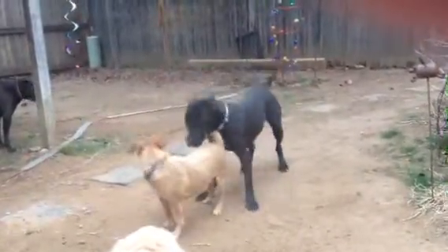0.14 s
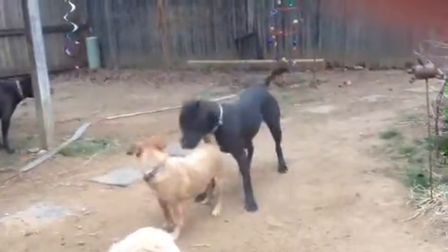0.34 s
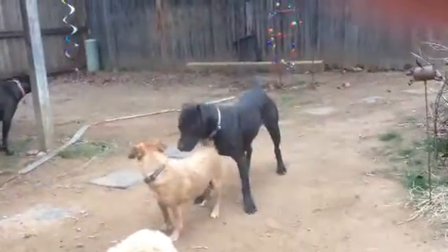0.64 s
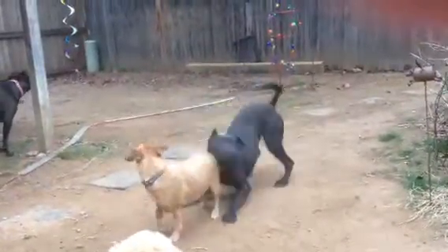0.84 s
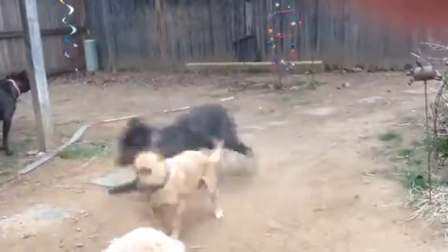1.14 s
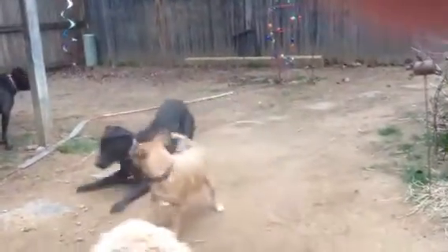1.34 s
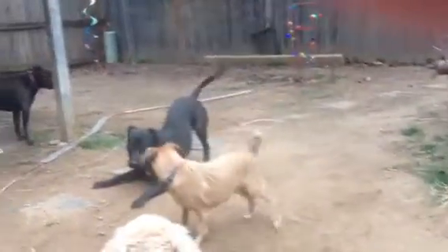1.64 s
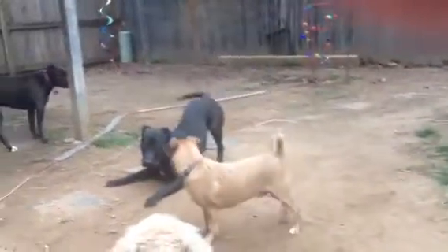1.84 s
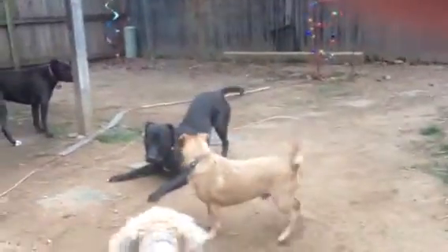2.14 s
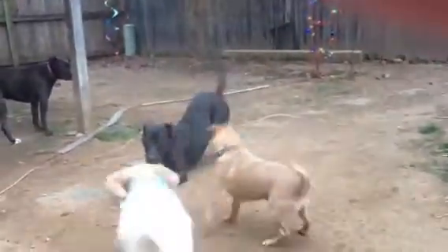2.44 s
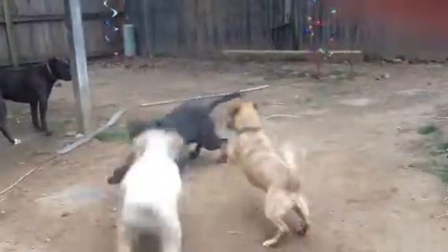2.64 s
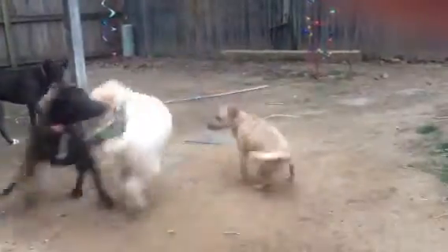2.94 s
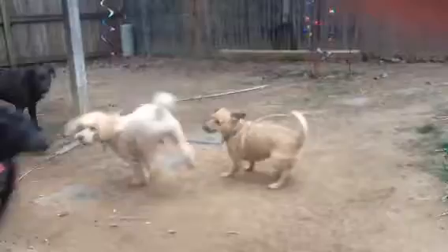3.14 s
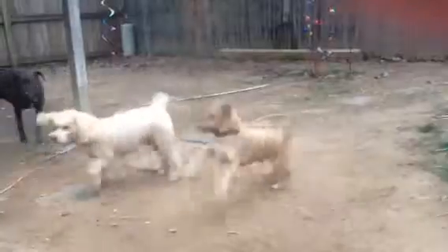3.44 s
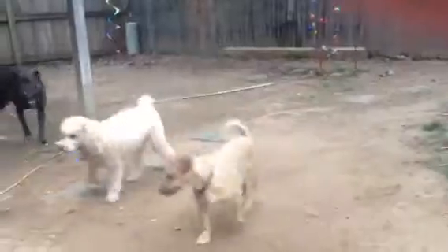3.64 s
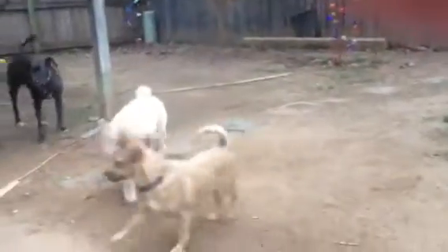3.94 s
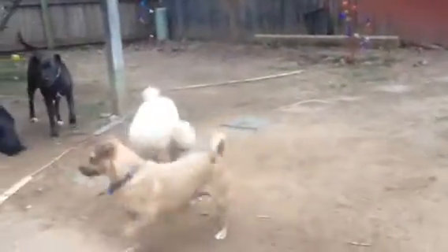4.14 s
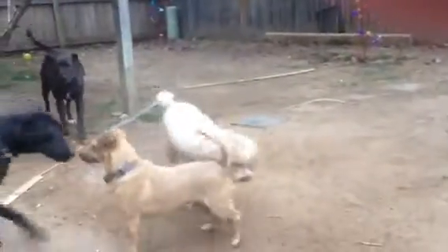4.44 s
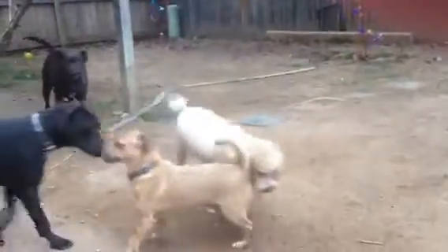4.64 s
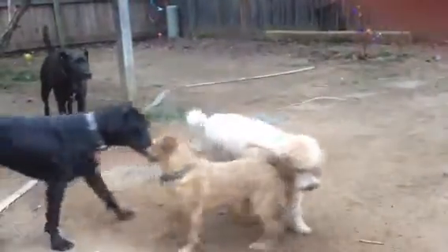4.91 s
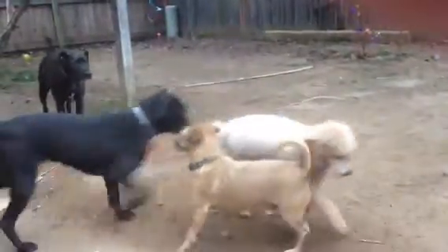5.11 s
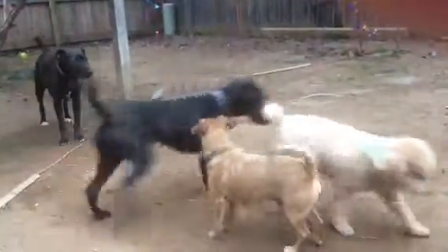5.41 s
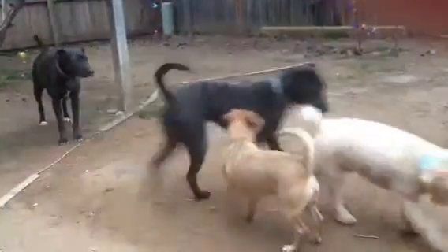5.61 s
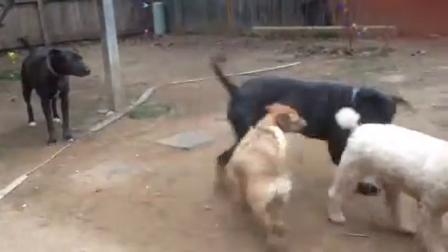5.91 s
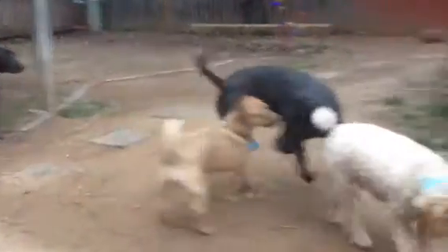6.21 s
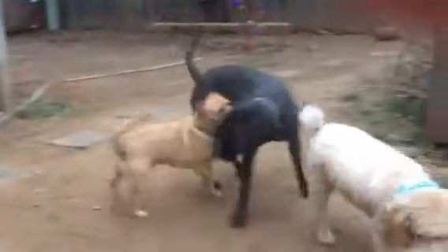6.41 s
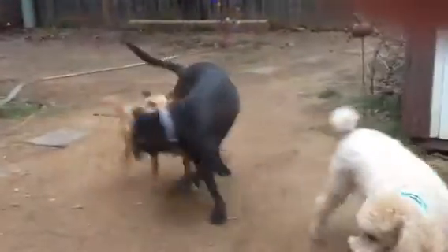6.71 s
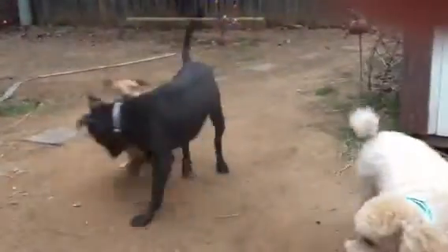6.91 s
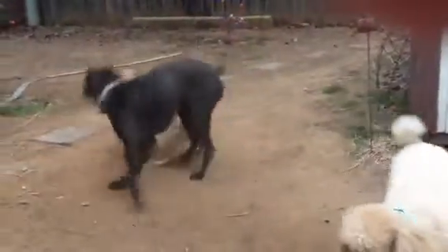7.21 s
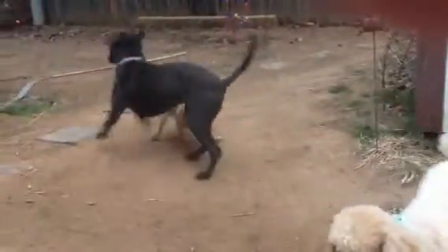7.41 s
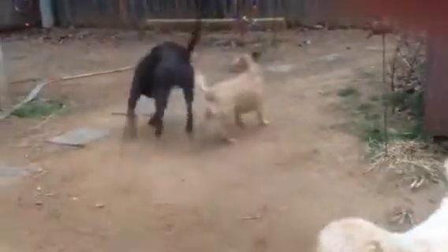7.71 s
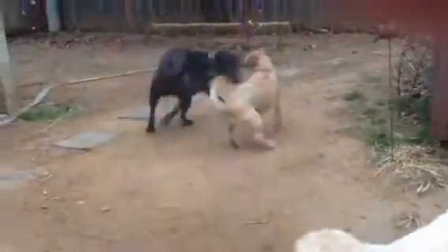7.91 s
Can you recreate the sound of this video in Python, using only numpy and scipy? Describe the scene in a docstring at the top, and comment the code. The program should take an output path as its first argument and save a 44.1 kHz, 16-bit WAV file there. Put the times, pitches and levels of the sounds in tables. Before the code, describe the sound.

Dogs play outdoors with high yelps and one harsh bark, while paws scuff the dirt and collar tags jingle.

```python
"""Dogs wrestle in a fenced dirt yard, over a low outdoor hum. First paws scuff and thud, grit ticks
and collar tags jingle. From 2.2 s a small dog's vocal folds yelp in rising and falling arcs, rasping
as the mouth widens. At 2.8 s one harsh bark breaks out over a growl of loose throat tissue; a gruff
huff follows at 3.3 s. Yelps return at 4.1 and 5.2 s, echoed by the fences. Faint moans and whimpers
come last, as the scuffing and jingling go on."""
import sys
import numpy as np
from scipy import signal
from scipy.fft import rfft, irfft, next_fast_len
from scipy.io import wavfile
from scipy.ndimage import map_coordinates

SR = 44100
rng = np.random.default_rng(int(sys.argv[2]) if len(sys.argv) > 2 else 0)


def master(y):
    """Save y as 16-bit WAV."""
    cut = np.clip(np.atleast_2d(y).T, -1, 1)
    pcm = np.round(cut * 32767)  # scale
    wavfile.write(sys.argv[1], SR, pcm.astype(np.int16))


N = 355446

# Spectra: (frequency [Hz], level [dB])
HUM_SPECTRUM = [(15, -93), (25, -57), (64, -13.5), (91, -12.5), (110, 0), (228, 2), (371, -8.5),
                (1010, -10), (2810, -20.5), (3490, -26), (4450, -25), (5670, -41.5), (8270, -38),
                (13400, -33), (15800, -38)]
HISS_SPECTRUM = [(1500, -59.5), (3500, -15.5), (4700, -8.5), (5600, 7), (6300, -2.5), (7500, -16),
                 (12000, -50)]
DIRT_SPECTRUM = [(530, -44), (900, -12), (1010, -15), (1160, -14.5), (1740, -11), (2620, -9), (4540, -6.5),
                 (5440, 3.5), (9100, -24), (14900, -14), (15800, -23)]
GROWL_SPECTRUM = [(40, -32.5), (120, -11.5), (230, 5), (330, 12), (500, -17), (900, -31), (3000, -75)]
HUFF_SPECTRUM = [(71, -44), (120, -13), (339, -4), (484, -21.5), (647, 0.5), (780, -10.5), (1100, -7.5),
                 (1300, -23.5), (2240, -16.5), (2480, -19.5), (7000, -26), (9100, -32), (15400, -120)]
MOAN_SPECTRUM = [(200, -48), (320, 4), (380, 3.5), (440, -21), (600, -38), (1500, -49)]
BARK_RASP_SPECTRUM = [(120, -68.5), (520, -24), (700, 1.5), (800, 0.5), (930, -3.5), (1170, 1.5),
                      (1450, -1.5), (1850, -16.5), (2400, -6), (3200, -22), (5300, -28), (6400, -28.5),
                      (7800, -52.5), (15000, -58)]
YELP_RASP_SPECTRUM = [(100, -72.5), (480, -30), (680, -3), (900, -7), (1200, 6), (1400, -3.5), (1750, -7),
                      (2300, 0.5), (2650, -20), (3000, -25), (4000, -17.5), (4500, -22), (5500, -22),
                      (9000, -46.5)]
MOUTH_SPECTRUM = [(400, -0.5), (1300, -1.5), (1850, -2.5), (2450, -6.5), (2850, -2.5), (3400, -20.5),
                  (4050, -12), (4450, -19.5), (4800, -20.5), (5600, -11.5), (6400, -31), (7300, -36),
                  (8400, -25.5), (9600, -50)]
EARTH_SPECTRUM = [(30, -35), (90, -14.5), (160, -8), (250, 3), (500, -30), (3000, -41)]
TEETH_SPECTRUM = [(500, -60), (2000, -22), (3500, -5), (5100, 1), (6300, -7.5), (7800, -24),
                  (15000, -19.5)]
# Grit spectrum: (frequency / pitch [ratio], level [dB])
TICK_SHAPE = [(.1, -50), (.72, -18), (.85, -2), (1.1, 0), (1.5, -16), (2.1, -15), (2.6, -26)]
# Yard decay: (frequency [Hz], t60 [s])
YARD_DECAY = [(150, 0.71), (700, 0.46), (1400, 0.54), (3000, 0.57), (6000, 0.46), (14000, .33)]
# Paw landings: (time [s], level [dB])
PAW_THUDS = [(0.795, -44.5), (0.925, -51), (1.265, -58), (3.56, -58.5)]
# Paw slides: (peak time [s], length [s], relative level [dB])
PAW_SLIDES = [(0.093, 0.11, -58.5), (0.721, .07, -60), (.79, .14, -55), (0.944, 0.39, -49.5),
              (1.154, .1, -49.5), (1.266, 0.46, -47), (1.675, 0.078, -58), (2.128, .11, -55),
              (2.47, 0.44, -48.5), (2.658, 0.23, -43), (2.86, 0.31, -40), (2.999, .2, -45),
              (3.161, .22, -51), (3.368, 0.43, -50), (3.58, 0.53, -54), (4.038, 0.14, -62.5),
              (4.779, .07, -56.5), (4.877, .14, -56), (5.019, 0.39, -58.5), (5.567, 0.085, -64),
              (6.205, 0.3, -61), (6.428, 0.11, -59.5), (6.539, .1, -64.5), (6.8, 0.49, -57.5),
              (7.071, 0.43, -56), (7.262, .07, -52), (7.369, 0.3, -54), (7.749, .22, -46.5),
              (8.001, .15, -52)]
# Claw and grit impacts: (time [s], relative level [dB], pitch [Hz])
GRIT_TICKS = [(1.274, -28, 5140), (1.58, -47, 5700), (1.669, -44, 5140), (2.462, -25.5, 5600),
              (2.635, -19, 2873), (2.976, -18.5, 5500), (3.215, -27, 5655), (3.326, -29.5, 3046),
              (3.336, -33.5, 5350), (3.56, -23, 5890), (3.567, -36, 4850), (3.651, -33.5, 5520),
              (3.7, -37.5, 5903), (3.739, -32, 5050), (3.979, -34.5, 5700), (4.076, -34.5, 4370),
              (5.235, -45.5, 5490), (5.347, -37.5, 5700), (6.737, -39.5, 5390), (6.794, -45, 5690),
              (6.843, -39.5, 5320), (7.003, -25, 4770), (7.012, -37.5, 5410), (7.018, -35, 5450),
              (7.249, -35, 5500), (7.362, -41, 5640), (7.384, -30, 5560), (7.494, -42.5, 5700),
              (7.725, -29, 3166)]
# Tag collisions: (time [s], relative level [dB])
TAG_HITS = [(0.777, -48), (0.926, -46.5), (0.989, -51), (1.089, -45), (1.118, -40.5), (1.313, -45),
            (1.367, -43), (2.587, -43.5), (2.974, -25.5), (3.012, -38), (3.078, -45), (3.136, -42),
            (3.188, -43.5), (3.65, -46.5), (5.576, -56), (7.25, -42), (7.322, -46), (7.552, -52.5),
            (7.879, -45.5)]
# Tag modes: (frequency [Hz], relative level [dB], t60 [s])
TAG_MODES = [(5690, 4.5, 0.36), (6573, -15.5, .2), (10000, -4.5, 0.45), (13230, 1, .16), (14770, -2, .16)]
# Buckle impacts: (time [s], relative level [dB], frequency [Hz], t60 [s])
BUCKLE_HITS = [(1.118, -33, 13200, 0.059), (1.479, -47, 10400, 0.074), (2.666, -23.5, 6480, 0.035),
               (3.164, -25.5, 4180, 0.028), (3.739, -34, 11500, 0.044), (3.935, -34.5, 12970, 0.037),
               (6.736, -40, 10170, 0.06), (7.363, -36.5, 11790, 0.073), (7.725, -33, 6540, 0.28)]
# Gruff breaths: (peak time [s], rise [s], fall [s], level [dB])
MOAN_SWELLS = [(5.72, .16, 0.27, -57.5), (7.32, .2, 0.24, -60)]
GROWL_SWELLS = [(2.63, 0.13, 0.2, -58), (2.83, .06, 0.12, -40), (2.98, .04, 0.034, -41)]
HUFF_SWELLS = [(3.345, .04, .11, -43)]
# Whimpers, and breaks into a lower fold oscillation:
# (peak time [s], rise [s], fall [s], pitch [Hz], level [dB], overtone drive [dB], rasp [dB re tone])
WHIMPER_NOTES = [(2.065, .05, .07, 3580, -69, 0, -10), (3.66, 0.17, 0.26, 3450, -68.5, -5, -16.5),
                 (6.05, .2, 0.4, 3480, -68.5, -1, -14), (6.77, 0.3, 0.31, 3456, -74, -10, -13.5)]
BREAK_NOTES = [(2.402, .022, .085, 754, -32, -12, -2.5), (2.665, .032, 0.058, 600, -47.5, -7.5, -2),
               (4.142, .027, 0.032, 660, -29, 18.5, -23), (4.342, .035, 0.036, 742, -29.5, -28.5, -16.5),
               (4.395, .022, .09, 670, -46, -6.5, -10), (5.284, .04, 0.027, 675, -34, -4.5, -2),
               (5.328, 0.028, 0.022, 695, -36.5, 19, -23)]
# Bark contour: (time [s], pitch [Hz], level [dB], overtone drive [dB], rasp [dB re tone])
BARK_CONTOUR = [(2.765, 631.7, -56.5, 5.5, 6.5), (2.809, 741, -35, -2, 9), (2.827, 761.5, -23, -3, 2.5),
                (2.868, 786.8, -14.5, -9, 1.5), (2.908, 782.4, -22, -5, 4.5), (2.935, 777, -16, -16, -3),
                (2.957, 753.4, -26, -19, -2.5), (3.018, 774.4, -31.5, -6, -5.5),
                (3.04, 797, -36.5, -7, -12)]
# Yelps: (start [s], rise [s], fall [s], start pitch [Hz], top pitch [Hz], end pitch [Hz],
# rise bend [1 = straight], loudest at [0-1], level [dB], swell [dB], mouth widest at [0-1],
# overtone drive there [dB], rasp there [dB re tone])
YELP_ARCS = [(2.18, 0.078, 0.023, 1206, 1626, 1610, 2.78, .42, -23.5, 13.5, 0.073, 12, -9.5),
             (2.28, 0.0045, 0.029, 1130, 1122, 886, 1.5, .4, -41, 5, 0.74, -4, -14),
             (2.305, 0.083, 0.013, 936, 1229, 1230, 2, .55, -31, 8.2, 0.55, 6, -7.5),
             (2.382, 0.042, 0.032, 1224, 1333, 1240, 1.8, 0.16, -25.5, 17, 0.95, 3.5, -2),
             (2.454, 0.0041, .068, 1160, 1168, 985, 1, .3, -28.5, 10, 0.055, -2, -8),
             (2.52, 0.077, 0.047, 998, 1247, 912, 1.5, 0.2, -27, 10, .68, 0, -10),
             (2.886, .005, 0.041, 1264, 1282, 916, 1, .4, -21, 15, 0.55, -8.5, -10.5),
             (2.975, 0.071, 0.017, 1130, 1309, 1320, 2.4, 0.38, -26, 19, 0.29, -0.5, -5.5),
             (4.078, .085, 0.073, 724, 1349, 778, 2.3, 0.29, -26.5, 16.6, .3, 5, -8),
             (4.246, 0.11, .02, 801, 1207, 1186, 2.2, .53, -26.5, 14.3, .68, -7.5, -10),
             (4.372, .004, 0.0192, 1204, 1211, 828, 1, 0.28, -33, 9, .4, -6, -6),
             (5.238, 0.09, .02, 825.5, 1405, 1360, 2.08, 0.83, -22.5, 29.8, .4, 10, -3.5)]

TOP_HZ = 15700


def amp(db):
    """Decibels to gain."""
    return 10 ** (np.asarray(db) / 20)


def along(points, hz):
    """(Hz, value) points read on a log axis."""
    f, v = np.transpose(points)
    return np.interp(np.log(hz + 1), np.log(f + 1), v)


def curves(rows):
    """Start time, then each column per sample."""
    s, *cols = np.transpose(rows)
    t = np.arange(s[0], s[-1], 1 / SR)
    return [s[0]] + [np.interp(t, s, c) for c in cols]


def add(track, s, sound):
    """Mix a sound in at time s."""
    part = track[max(round(s * SR), 0):][:len(sound)]
    part += sound[:len(part)]


def wobble(rate_hz, n):
    """Smooth random curve, knots at rate_hz."""
    knots = rng.standard_normal(int(n * rate_hz / SR) + 4)
    return map_coordinates(knots, [np.arange(n) * rate_hz / SR])


def phase_rad(hz):
    """Running phase of a frequency curve."""
    return 2 * np.pi * np.cumsum(hz) / SR


def filtered(x, response):
    """Apply a frequency response."""
    m = next_fast_len(len(x) + 8192)
    return irfft(rfft(x, m) * response(np.fft.rfftfreq(m, 1 / SR)), m)[:len(x)]


def coloured(x, spectrum):
    """Shape by a spectrum; rms 1."""
    y = filtered(x, lambda hz: amp(along(spectrum, hz)))
    return y / np.sqrt(np.mean(y ** 2) + 1e-20)


def swell(peak_s, rise_s, fall_s, db, fade_db=21.5):
    """One rounded push: (time [s], distance from peak [0-1], level [dB])."""
    x = np.linspace(-1, 1, 41)
    return peak_s + x * np.where(x < 0, rise_s, fall_s), np.abs(x), db - fade_db * x ** 2


def outdoors(hum_db=-57.5, hiss_db=-73):
    """Distant town hum and thin steady hiss."""
    hum = coloured(rng.standard_normal(N), HUM_SPECTRUM) * amp(hum_db + 0.14 * wobble(8.9, N))
    return hum + amp(hiss_db) * coloured(rng.standard_normal(N), HISS_SPECTRUM)


def yard(x, build_s=0.018):
    """Fences and walls scatter a tail that builds, then dies faster in the treble."""
    hz, t, noise = signal.stft(rng.standard_normal(SR), SR, nperseg=256)
    decay = amp(-60 * t / along(YARD_DECAY, hz)[:, None])
    tail = signal.istft(noise * decay * (1 - np.exp(-t / build_s)), SR, nperseg=256)[1]
    return signal.fftconvolve(x, tail / np.linalg.norm(tail))[:N]


def walls(x, total_db=-13, count=7):
    """Direct sound plus weak echoes off the house wall and near fence."""
    out = x.copy()
    for delay_s, sign in zip(rng.uniform(.008, .06, count), rng.choice([-1, 1], count)):
        add(out, delay_s, sign * amp(total_db) / np.sqrt(count) * x)
    return out


def footfalls(t60_s=0.19, attack_s=0.0036):
    """Soft pads on packed earth: one dull push each."""
    out, t = np.zeros(N), np.arange(SR // 5) / SR
    for s, db in PAW_THUDS:
        envelope = amp(db - 60 * t / t60_s) * (1 - np.exp(-t / attack_s))
        add(out, s, envelope * coloured(rng.standard_normal(len(t)), EARTH_SPECTRUM))
    return out


def scuffs(grain_db=2.5, clump_db=2.5, catch_db=0.6, gain_db=-2.5, dig_share=.38):
    """Sliding paws catch and slip, crushing dirt into a clumped spray of grains."""
    power = amp(-78 + 3 * wobble(7.7, N)) ** 2  # light steps between slides
    for peak_s, length_s, db in PAW_SLIDES:
        t, _, level_db = swell(peak_s, dig_share * length_s, (1 - dig_share) * length_s, db)
        s, slide_db = curves(np.transpose([t, level_db]))
        add(power, s, amp(slide_db) ** 2)
    grains = rng.standard_normal(N)
    grains *= amp(grain_db * wobble(1500, N) + clump_db * wobble(90, N) + catch_db * wobble(28, N))
    return amp(gain_db) * np.sqrt(power) * coloured(grains, DIRT_SPECTRUM)


def grit(t60_s=0.017, gain_db=-8):
    """Claws and grit tick: short bursts around the pitch of the thing hit."""
    out, t = np.zeros(N), np.arange(SR // 20) / SR
    for s, db, hz in GRIT_TICKS:
        spectrum = [(hz * ratio, level_db) for ratio, level_db in TICK_SHAPE]
        burst = coloured(rng.standard_normal(len(t)), spectrum)
        add(out, s, amp(db + gain_db - 60 * t / t60_s) * burst)
    return out


def ring(hz, t60_s, chatter=0.014):
    """One struck mode of loose metal chattering against its neighbours."""
    t = np.arange(SR // 3) / SR
    pitch_hz = hz * (1 + chatter * wobble(417.6, len(t)))
    contact = np.clip(1 + wobble(110, len(t)), 0, 2)  # neighbours mute it on and off
    return contact * amp(-60 * t / t60_s) * np.sin(phase_rad(pitch_hz))


def collars(tag_db=-14, buckle_db=-5, click_db=-13, pair_ratio=1.022):
    """Tags click and ring anew at each touch; buckles chink on two close modes."""
    out, t = np.zeros(N), np.arange(SR // 3) / SR
    for s, db in TAG_HITS:
        modes = sum(amp(mode_db + rng.normal(0, 3)) * ring(hz * rng.normal(1, 0.004935), t60_s)
                    for hz, mode_db, t60_s in TAG_MODES)
        click = coloured(rng.standard_normal(len(t)), DIRT_SPECTRUM) * amp(-60 * t / .025)
        add(out, s, amp(db + tag_db) * modes + amp(db + click_db) * click)
    for s, db, hz, t60_s in BUCKLE_HITS:
        pair = ring(hz, t60_s) + .5 * ring(hz * pair_ratio, t60_s / 2)
        add(out, s, amp(db + buckle_db) * pair / 2)
    return out


def growl(swells, spectrum, flutter_hz, depth_db):
    """Loose throat tissue chops the air into uneven puffs."""
    out = np.zeros(N)
    for row in swells:
        t, _, level_db = swell(*row)
        s, db = curves(np.transpose([t, level_db]))
        n = len(db)
        phase = phase_rad(flutter_hz * (1 + .2 * wobble(49.1, n)))
        puffs = rng.standard_normal(n) * amp(depth_db * np.cos(phase))
        add(out, s, amp(db) * coloured(puffs, spectrum))
    return out


def snarl(peak_s=2.836, width_s=.022, db=-26):
    """Air hisses past bared teeth as the bark opens."""
    envelope = np.exp(-.5 * ((np.arange(N) / SR - peak_s) / width_s) ** 2)
    return amp(db) * envelope * coloured(rng.standard_normal(N), TEETH_SPECTRUM)


def note(peak_s, rise_s, fall_s, hz, db, overtone_db, rasp_db, sag):
    """Contour of a swelling note; pitch sags as effort drops."""
    t, off_peak, level_db = swell(peak_s, rise_s, fall_s, db)
    pitch_hz = hz * (1 - sag * off_peak ** 2)
    return np.transpose(np.broadcast_arrays(t, pitch_hz, level_db, overtone_db, rasp_db))


def yelp(s, rise_s, fall_s, start_hz, top_hz, end_hz, bend, loudest, db, swell_db, widest,
         overtone_db, rasp_db, onset_s=.006, stop_s=.0063, gape_db=15, strain_db=19.5, gape_share=.21):
    """Yelp contour: pitch shoots up and rolls off; bright and hoarse while the mouth is wide."""
    length_s = rise_s + fall_s
    t = np.linspace(0, length_s, 200)
    up, down = np.clip(t / rise_s, 0, 1), np.clip((t - rise_s) / fall_s, 0, 1)
    pitch_hz = top_hz - (top_hz - start_hz) * (1 - up) ** bend
    pitch_hz -= (top_hz - end_hz) * np.sin(np.pi / 2 * down) ** 2
    share = t / length_s
    off_peak = np.maximum((loudest - share) / loudest, (share - loudest) / (1 - loudest))
    gate = np.tanh((t / onset_s) ** 2) * np.tanh((length_s - t) / stop_s)  # folds start and stop
    level_db = db - swell_db * off_peak ** 2 + 20 * np.log10(np.maximum(gate, 1e-3))
    closed = 1 - np.exp(-.5 * ((share - widest) / gape_share) ** 2)
    return np.transpose([t + s, pitch_hz, level_db,
                         overtone_db - gape_db * closed, rasp_db - strain_db * closed])


def voice(contours, rasp_spectrum, jitter, shimmer, tilt_db_oct, flutter,
          jaw=.009, waver=.008, flutter_hz=310, low_cut_hz=380):
    """Vocal folds sound through the mouth; when rough, pitch and level scatter and the throat rasps."""
    out = np.zeros(N)
    for contour in contours:
        s, pitch_hz, db, overtone_db, rasp_db = curves(contour)
        n = len(pitch_hz)
        rough = np.minimum(amp(rasp_db), .5)
        pitch_hz *= 1 + jitter * (0.0996 + rough) * wobble(450, n) + waver * wobble(89.96, n)
        flap = np.sin(phase_rad(flutter_hz * (1 + .2 * wobble(50, n))))  # slower fold motion: sidebands
        phase = phase_rad(pitch_hz) + flutter * rough * flap
        tone = np.sin(phase)
        for k in range(2, 10):
            gain = amp(along(MOUTH_SPECTRUM, k * pitch_hz) + overtone_db + tilt_db_oct * np.log2(k))
            tone += gain * (k * pitch_hz < TOP_HZ) * np.sin(k * phase)
        tone /= np.sqrt((1 + amp(overtone_db) ** 2 / 2) / 2)  # overtones drain the fundamental
        tone *= amp(shimmer * rough * wobble(260, n))
        stretch = np.cumsum(1 + jaw * (overtone_db + 7))  # a wider mouth lifts the throat resonances
        rasp = map_coordinates(coloured(rng.standard_normal(2 * n), rasp_spectrum), [stretch])
        add(out, s, amp(db) * (tone + amp(rasp_db) * rasp))
    # a small mouth radiates no bass
    return filtered(out, lambda hz: (1 - np.exp(-(hz / low_cut_hz) ** 2)) ** 2)


def scene():
    """Voices, paws and collars in the yard; mono."""
    cries = voice([yelp(*row) for row in YELP_ARCS], YELP_RASP_SPECTRUM,
                  jitter=.046, shimmer=9, tilt_db_oct=-4.5, flutter=.38)
    cries += voice([note(*row, sag=.15) for row in BREAK_NOTES], YELP_RASP_SPECTRUM,
                   jitter=.036, shimmer=6.5, tilt_db_oct=-3.5, flutter=.38)
    cries += voice([note(*row, sag=.12) for row in WHIMPER_NOTES], YELP_RASP_SPECTRUM,
                   jitter=.07, shimmer=19, tilt_db_oct=-2, flutter=1.8)
    bark = voice([BARK_CONTOUR], BARK_RASP_SPECTRUM,
                 jitter=.02, shimmer=3, tilt_db_oct=-6.5, flutter=.15, jaw=.013) + snarl()
    gruff = growl(GROWL_SWELLS, GROWL_SPECTRUM, flutter_hz=82.4, depth_db=2)
    gruff += growl(HUFF_SWELLS, HUFF_SPECTRUM, flutter_hz=66.8, depth_db=2)
    gruff += growl(MOAN_SWELLS, MOAN_SPECTRUM, flutter_hz=41.73, depth_db=4.5)
    clatter = collars() + grit()
    near = walls(cries) + bark + gruff + clatter + scuffs() + footfalls()
    tails = amp(-11) * yard(cries) + amp(-13.5) * yard(bark + gruff) + amp(-12) * yard(clatter)
    return (near + tails + outdoors())[None]


def record(dry):
    """Brick-wall low-pass at TOP_HZ."""
    return np.array([filtered(channel, lambda hz: hz < TOP_HZ) for channel in dry])


dry = scene()
out = record(dry)
master(out)
```